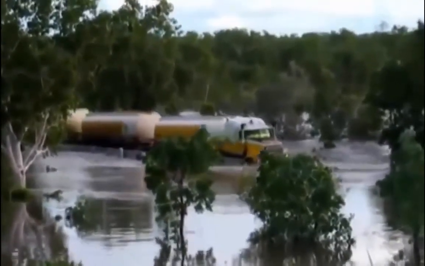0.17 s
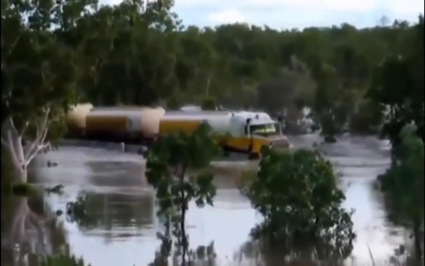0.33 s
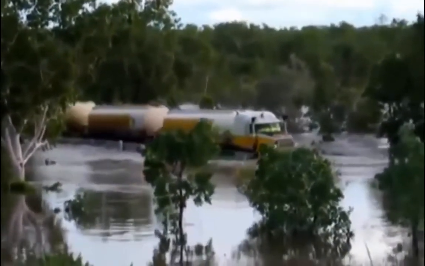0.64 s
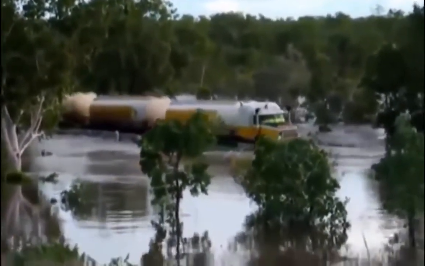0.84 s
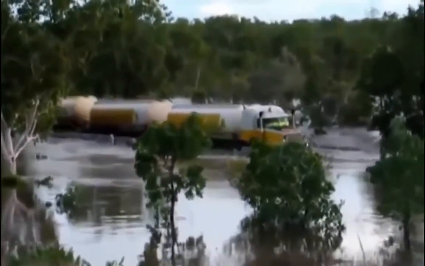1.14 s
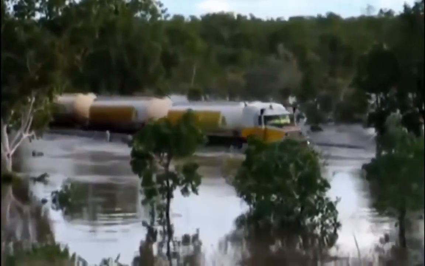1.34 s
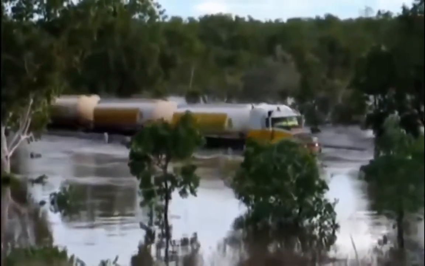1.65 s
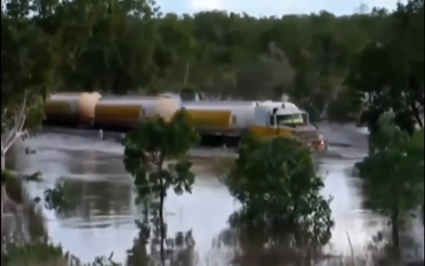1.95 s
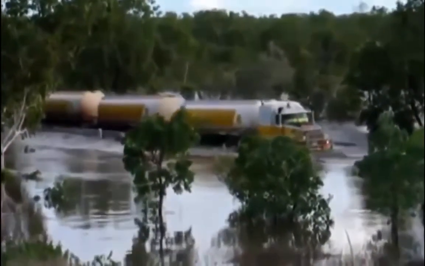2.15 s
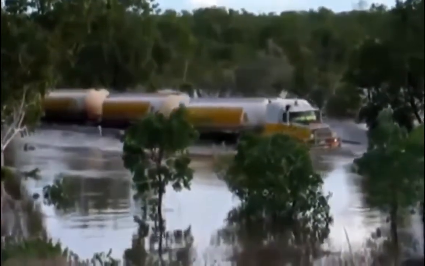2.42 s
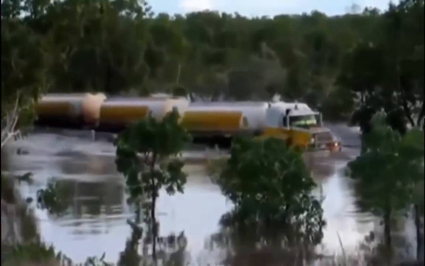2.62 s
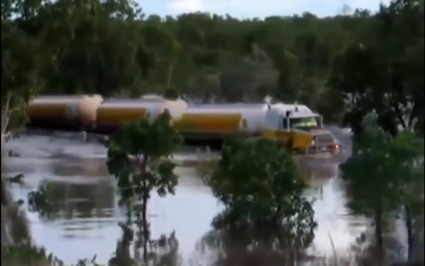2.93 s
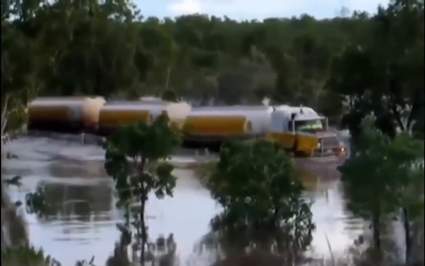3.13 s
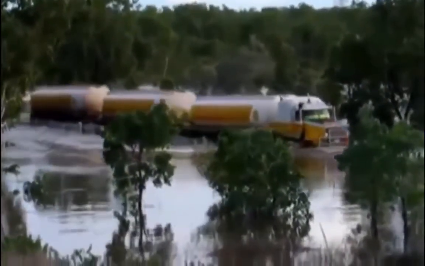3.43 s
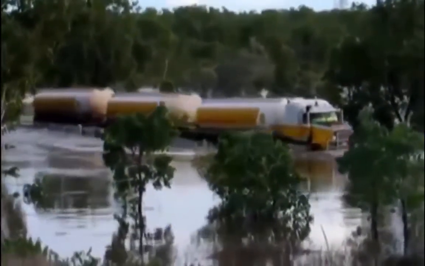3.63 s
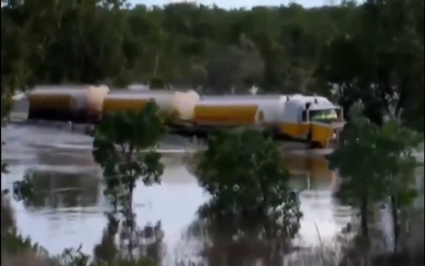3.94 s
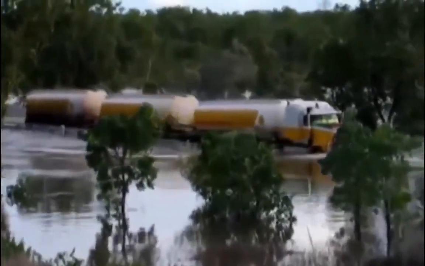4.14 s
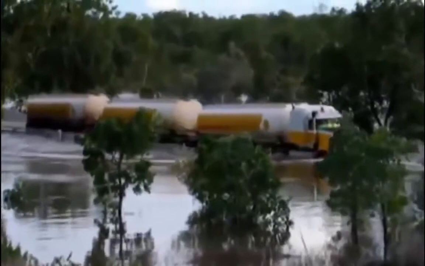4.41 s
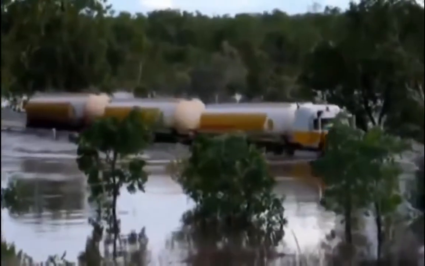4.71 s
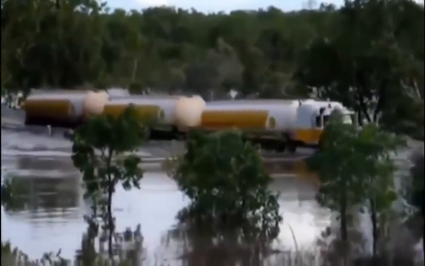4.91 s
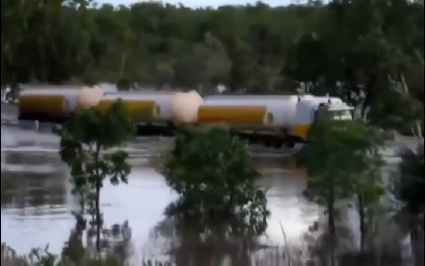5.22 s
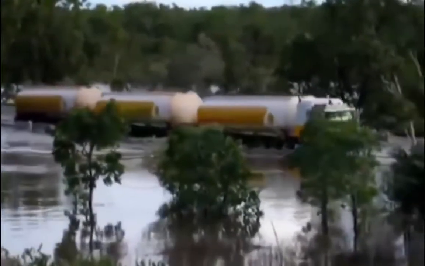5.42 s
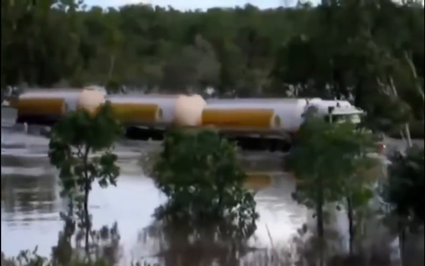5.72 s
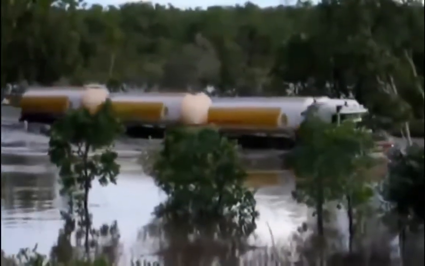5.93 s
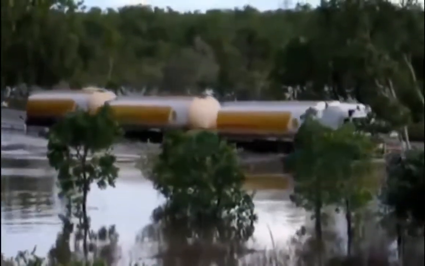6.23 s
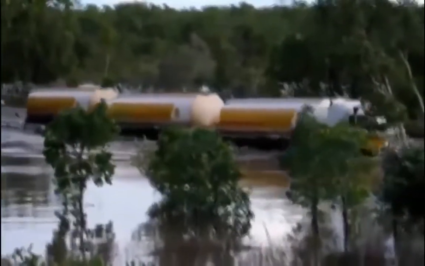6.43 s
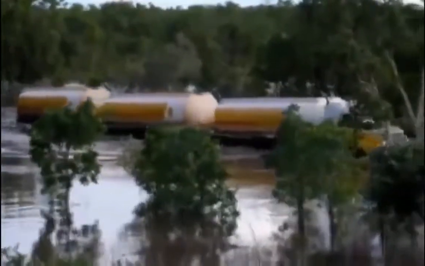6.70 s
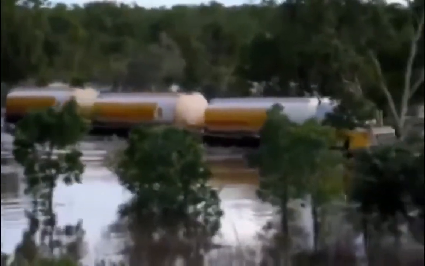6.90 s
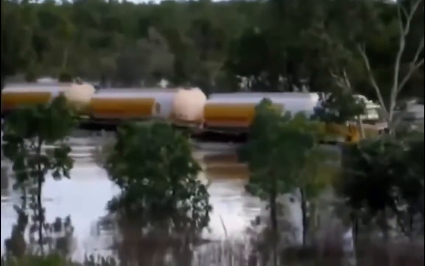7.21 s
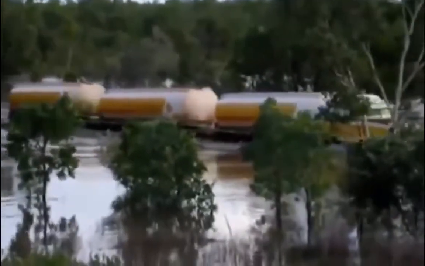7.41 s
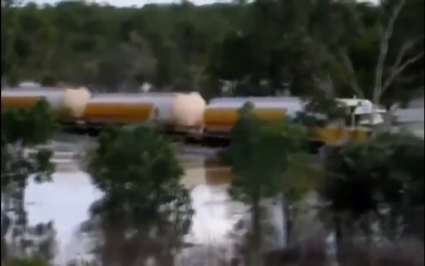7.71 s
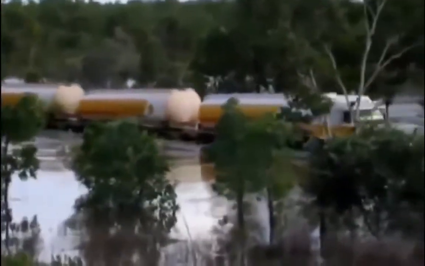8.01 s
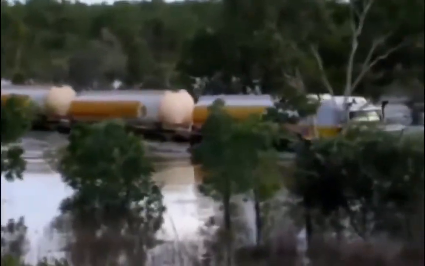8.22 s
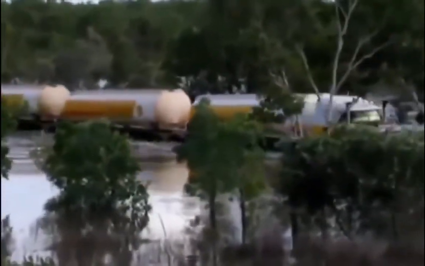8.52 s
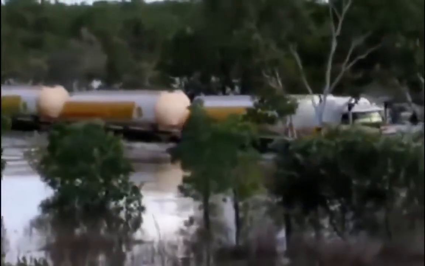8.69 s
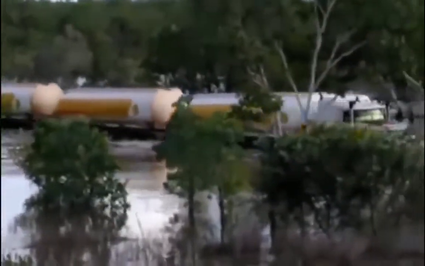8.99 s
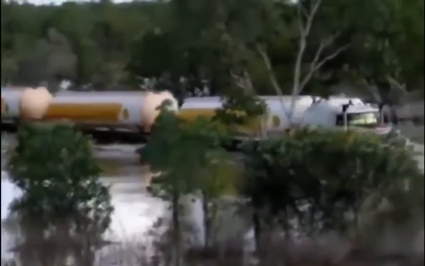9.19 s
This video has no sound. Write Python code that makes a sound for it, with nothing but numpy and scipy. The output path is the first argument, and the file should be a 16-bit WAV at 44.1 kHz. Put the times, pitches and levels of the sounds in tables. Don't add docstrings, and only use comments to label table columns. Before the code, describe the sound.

Quiet rushing flood water with a faint distant diesel hum abruptly cuts to a loud, muffled truck engine drone with buffeting wind and spray.

```python
import sys
import numpy as np
from scipy import signal
from scipy.fft import rfft, irfft, next_fast_len
from scipy.io import wavfile
from scipy.ndimage import uniform_filter1d, map_coordinates

SR = 44100
rng = np.random.default_rng(int(sys.argv[2]) if len(sys.argv) > 2 else 0)


def wav_out(sig):
    wavfile.write(sys.argv[1], SR, np.round(np.clip(np.atleast_2d(sig).T, -1, 1) * 32767).astype(np.int16))


def decibels_to_gain(level_db):
    exponent = np.asarray(level_db, float) / 20
    return 10 ** exponent


N = 412335
CUT_S = 4.2076

# time_s, wash_db, hum_hz
FAR_COURSE = [(0, -45.5, 131), (0.8, -47.5, 132.6), (1.25, -46.5, 131.3), (1.55, -45, 125.8),
              (2.0, -44.5, 128.9), (2.4, -44.5, 133), (2.85, -43.5, 125.5), (2.91, -45, 125),
              (3.2, -46, 122.1), (3.95, -45, 122.6), (4.1, -44, 124), (4.2, -45, 124.3)]
# freq_hz, density_db
FAR_WASH_SPECTRUM = [(20, -27), (60, -2.5), (180, -4), (400, -7.5), (600, -17.5), (1300, -13.5),
                     (2700, -9.5), (3500, -13.5), (4700, -16.5), (5800, -16.5), (7800, -21), (8800, -27.5),
                     (10950, -30.5), (11050, -48), (14900, -50)]
# centre_hz, width_hz, gain_db
FAR_WASH_MODES = [(828, 430, 15.5), (1617, 89, 10.5), (2177, 280, 13), (4140, 300, 3)]
# centre_hz, width_hz, gain_db
FAR_HUM_MODES = [(38.5, 5.9, -9), (88.5, 19, 6), (150, 10, 19)]
# freq_hz, density_db
GROUND_SPECTRUM = [(8, -3), (20, 4), (35, -3), (60, -32)]
# time_s, peak_db, pitch_hz
DROPLETS = [
    (1.5544, -26, 2230),
    (1.557, -26, 3300),
    (2.0344, -38, 2190),
    (2.4244, -32, 2200),
]
# start_s, stop_s, last_db, growth_db_per_s
AIR_BURSTS = [
    (1.96, 2.867, -36, 29),
    (4.015, 4.135, -37.5, 30),
]
# freq_hz, density_db
AIR_SPECTRUM = [(1500, -34), (2500, 4), (4000, 1), (5200, -2.5), (5750, 8.5), (6400, 2), (7800, -1),
                (9000, -8.5), (10950, -11.5), (11050, -25), (14900, -38)]
# time_s, second_order_hz, second_order_db
ENGINE_COURSE = [(4.21, 163.8, -17), (4.8, 162.1, -21), (5.15, 162.6, -18.5), (5.4, 162.3, -18.5),
                 (6.1, 161.7, -18), (6.55, 160.7, -17.5), (7.3, 161, -19.5), (7.95, 160.7, -15),
                 (8.2, 160.9, -18), (8.45, 161.4, -14), (9.2, 161.4, -14), (9.35, 159, -14.5)]
# multiple_of_firing_rate, level_re_second_db
WEAK_ORDERS = [(1, -24.5), (4, -17), (6, -23), (7, -23), (9, -23), (12, -24)]
# freq_hz, density_db
ROAR_SPECTRUM = [(45, -26.5), (75, -9.5), (150, -10), (260, -7.5), (400, -23.5), (560, -8), (790, -14.5),
                 (1050, -10), (1300, -17.5), (1800, -20), (2500, -23), (3300, -27), (15800, -27.5)]
# start_s, stop_s, level_db
SPRAY_SURGES = [
    (4.206, 4.448, -36.5),
    (5.079, 5.378, -27),
    (5.38, 5.909, -24.5),
    (6.0, 6.222, -33),
    (6.848, 7.317, -31),
    (7.617, 8.115, -32),
    (8.153, 8.939, -23.5),
    (8.89, 9.234, -24.5),
    (9.283, 9.41, -28),
]
# freq_hz, density_db
SPRAY_SPECTRUM = [(1500, -16), (2000, -4), (2400, -1), (2750, -10.5), (3200, -3.5), (3500, -12),
                  (5200, -23)]
# time_s, level_db, half_length_s
WIND_GUSTS = [(4.288, -16, 0.041), (4.489, -18, 0.085), (4.631, -11.5, .05), (4.859, -15.5, 0.067),
              (5.047, -14, 0.1), (5.326, -11, 0.072), (5.568, -15, 0.091), (5.698, -18, .04),
              (5.878, -16, 0.055), (6.1, -17, 0.04), (6.272, -11, 0.076), (6.4, -12.5, 0.026),
              (6.549, -12.5, .05), (6.741, -14, 0.032), (6.853, -12.5, .05), (7.052, -14, 0.051),
              (7.155, -14, 0.045), (7.492, -15, 0.029), (7.611, -12.5, 0.075), (7.854, -15.5, 0.06),
              (8.038, -13.5, 0.065), (8.153, -10.5, 0.037), (8.254, -15, 0.053), (8.705, -21.5, 0.061)]
# time_s, peak_db, pitch_hz
PORT_SLAPS = [(4.222, -12.5, 286), (4.312, -11.5, 306), (4.358, -9, 452), (4.504, -5, 339),
              (4.567, -9.5, 300), (4.612, -9.5, 380), (4.681, -6, 302), (4.758, -14.5, 360),
              (5.251, -13, 284), (5.4, -12.5, 283), (5.671, -10.5, 390), (5.783, -11, 344),
              (5.943, -7.5, 296), (6.102, -13, 318), (6.218, -4.5, 303), (6.362, -7, 394), (6.54, -12, 316),
              (6.622, -14, 306), (6.841, -8, 294), (6.998, -12, 247), (7.02, -9, 390), (7.23, -8.5, 375),
              (7.301, -4.5, 250), (7.427, -3.5, 336), (7.594, -12, 428), (7.789, -11, 335),
              (8.147, -17, 294), (8.189, -17, 241), (8.228, -11.5, 318), (8.7, -17, 336)]
# freq_hz, density_db
BUFFET_SPECTRUM = [(35, -18), (65, 0), (120, 0), (200, -2), (300, -16.5), (600, -32)]
# freq_hz, density_db
EDGE_SPECTRUM = [(120, -25), (200, 0.5), (300, -4.5), (450, -10.5), (800, -26), (1500, -32), (3000, -46.5)]
# freq_hz, density_db
HEAVE_SPECTRUM = [(15, -14), (30, -3.5), (50, -3), (80, -15)]
# time_s, depth_db, recovery_s
GAIN_DROPS = [(4.375, -6, 0.025), (4.52, -4.5, 0.039), (4.62, -2.5, 0.033), (4.70, -6.5, 0.025),
              (4.905, -6, 0.04), (5.079, -7, 0.075), (5.189, -5, 0.033), (5.41, -1.5, .03),
              (5.965, -5, 0.05), (6.3, -3.5, .03), (6.385, -6.5, 0.04), (6.44, -2.5, 0.025),
              (6.573, -8, 0.05), (6.65, -3.5, 0.023), (6.87, -5.5, 0.039), (7.335, -5, 0.027),
              (7.449, -6.5, 0.052), (7.63, -3.5, 0.047), (8.085, -7, 0.028), (8.246, -4, 0.029)]
# freq_hz, gain_db
CLOSE_EDGE = [(3300, 2), (3550, -4.5), (4600, -17), (4950, -20), (5200, -32), (15800, -45.5)]


def unit(x):
    return x / np.sqrt(np.mean(x ** 2) + 1e-20)


def curves(rows):
    s, *columns = np.transpose(rows)
    return [np.interp(np.arange(N) / SR, s, column) for column in columns]


def wobble(rate_hz):
    knots = rng.standard_normal(int(N * rate_hz / SR) + 4)
    return map_coordinates(knots, [np.arange(N) * rate_hz / SR])


def ramp(start_s, takes_s):
    return np.clip((np.arange(N) / SR - start_s) / takes_s, 0, 1)


def bump(centre_s, half_s):
    out = np.zeros(N)
    first = max(0, int((centre_s - 4 * half_s) * SR))
    last = min(N, int((centre_s + 4 * half_s) * SR))
    reach = np.arange(first, last)
    out[reach] = np.exp(-((reach / SR - centre_s) / half_s) ** 2)
    return out


def level(base_db, swells):
    power = decibels_to_gain(base_db) ** 2 + sum((decibels_to_gain(db) * shape) ** 2 for db, shape in swells)
    return 10 * np.log10(power)


def filtered(x, response):
    m = next_fast_len(N + 8192)
    return irfft(rfft(x, m) * response(np.fft.rfftfreq(m, 1 / SR)), m)[:N]


def colour(points):
    f, db = np.transpose(points)
    return lambda hz: decibels_to_gain(np.interp(np.log(hz + 1), np.log(f + 1), db, left=-120, right=-120))


def humps(modes):
    return lambda hz: sum(decibels_to_gain(db) / (1 + (2 * (hz - c) / w) ** 2) for c, w, db in modes)


def rush(response, patchy_db, spiky_db=0.0):
    noise = rng.standard_normal(N) * decibels_to_gain(spiky_db * wobble(900))
    z = signal.stft(noise, nperseg=512)[2]
    field = uniform_filter1d(rng.standard_normal(z.shape), size=6, axis=0)
    field = uniform_filter1d(field, size=10, axis=1)
    patched = signal.istft(z * decibels_to_gain(patchy_db * unit(field)), nperseg=512)[1][:N]
    return unit(filtered(patched, response))


def wavering(hz, drift_rad, flutter_db):
    phase = 2 * np.pi * np.cumsum(hz) / SR + drift_rad * wobble(12)
    return unit(decibels_to_gain(flutter_db * wobble(9)) * np.sin(phase))


def band(centre_hz, width_hz):
    phase = 2 * np.pi * np.cumsum(centre_hz) / SR
    return unit(wobble(width_hz) * np.cos(phase) + wobble(width_hz) * np.sin(phase))


def blips(rows, cycles):
    out, t = np.zeros(N + SR), np.arange(SR // 10) / SR
    for s, db, hz in rows:
        swing = np.sin(2 * np.pi * hz * t) * np.exp(-hz * t / cycles)
        out[round(s * SR):][:len(t)] += decibels_to_gain(db) * swing
    return out[:N]


def far_wash(wash_db):
    shape = lambda hz: colour(FAR_WASH_SPECTRUM)(hz) * (1 + 0.5 * humps(FAR_WASH_MODES)(hz))
    return decibels_to_gain(wash_db + 7.5 + 0.92 * wobble(12)) * rush(shape, patchy_db=0.5, spiky_db=-1.0)


def far_hum(effort_db, hum_hz):
    nears_db = 1.0 * (np.arange(N) / SR - 2)
    hum = decibels_to_gain(-47.5 + effort_db + nears_db) * wavering(hum_hz, drift_rad=0.99, flutter_db=0.0)

    boom_hz = 366.6 + 1.9 * (hum_hz - 128)
    boom_db = -51.5 + effort_db - 18 * bump(1.66, half_s=0.17)
    hum = hum + decibels_to_gain(boom_db) * wavering(boom_hz, drift_rad=1.2, flutter_db=3.0)

    lowest_db = -58
    hum = hum + decibels_to_gain(lowest_db + 6.0) * rush(humps(FAR_HUM_MODES), patchy_db=2.5)
    emerging_db = lowest_db + 5.5 * ramp(2.3, takes_s=0.3)
    for third, db in ((1, -2), (2, -1)):
        tone = wavering(hum_hz * third / 3, drift_rad=0.84, flutter_db=2.5)
        hum = hum + decibels_to_gain(emerging_db + db) * tone
    return hum


def ground_rumble():
    return decibels_to_gain(-61) * rush(colour(GROUND_SPECTRUM), patchy_db=-3.0)


def droplets():
    return filtered(decibels_to_gain(2.0) * blips(DROPLETS, cycles=2.5), lambda hz: hz < 11000)


def valve_air():
    t, edge_s = np.arange(N) / SR, 0.007
    swells = [(-51, ramp(1.7, takes_s=0.5))]
    for start_s, stop_s, last_db, growth in AIR_BURSTS:
        burst_db = last_db + growth * np.minimum(t - stop_s, 0)
        swells.append((burst_db, ramp(start_s, edge_s) - ramp(stop_s, edge_s)))
    air_db = level(-90, swells) + 1.5 * wobble(24.66)
    return decibels_to_gain(air_db) * rush(colour(AIR_SPECTRUM), patchy_db=1.0, spiky_db=1.5)


def far_truck():
    wash_db, hum_hz = curves(FAR_COURSE)
    effort_db = wash_db + 45.5
    truck = far_wash(wash_db) + far_hum(effort_db, hum_hz) + ground_rumble()
    return truck + droplets() + valve_air()


def diesel_drone(phase, second_db, load_db):
    windy_db = 1.2 * (1 - ramp(8.3, takes_s=0.1))
    third_db = -22 + 1.2 * load_db + windy_db * wobble(14)
    second_db = second_db + windy_db * wobble(14)
    second = np.sin(2 * phase + 0.051 * wobble(11))
    third = np.sin(3 * phase + 1.25 + 0.088 * wobble(15))
    drone = decibels_to_gain(second_db + 2.0 + 0.35 * wobble(20)) * second
    drone = drone + decibels_to_gain(third_db + 2.5 + 1.0 * wobble(22)) * third
    for multiple, db in WEAK_ORDERS:
        order_db = second_db - 2.5 + db + 2.2 * wobble(7.7)
        drone = drone + decibels_to_gain(order_db) * np.sin(round(multiple) * phase + 0.6 * wobble(8))
    return np.sqrt(2) * drone


def engine_roar(phase, load_db):
    roar_db = -28 + 1.3 * load_db + 1.9 * wobble(9.1)
    pulse = decibels_to_gain(0.5 * np.cos(phase + 0.26))
    noise = rush(colour(ROAR_SPECTRUM), patchy_db=-1.0, spiky_db=2.5)
    return decibels_to_gain(roar_db + 5.5) * unit(pulse * noise)


def wheel_spray():
    swells = []
    for start_s, stop_s, db in SPRAY_SURGES:
        rise = ramp(start_s, takes_s=0.33 * (stop_s - start_s))
        fall = 1 - ramp(stop_s, takes_s=0.049)
        swells.append((db, rise * fall))
    spray_db = level(-32, swells)
    hiss = rush(colour(SPRAY_SPECTRUM), patchy_db=2.5, spiky_db=-1.0)
    whistle = decibels_to_gain(0.6 * (spray_db + 24.5)) * band(2720 + 130 * wobble(5), width_hz=330)
    return decibels_to_gain(spray_db - 3.03 + 1.1 * wobble(30)) * (hiss + whistle)


def wind_strength():
    lull_db = -3 * ramp(8.3, takes_s=0.1)
    buffet_db = level(-20.5 + lull_db, [(db, bump(s, half_s)) for s, db, half_s in WIND_GUSTS])
    edge_db = level(-27 + lull_db, [(db - 8.5, bump(s, half_s=0.018)) for s, db, hz in PORT_SLAPS])
    return buffet_db, edge_db


def port_wind():
    buffet_db, edge_db = wind_strength()
    eddies = wobble(35)
    body = unit(decibels_to_gain(1.02 * eddies) * rush(colour(BUFFET_SPECTRUM), patchy_db=-1.0))
    buffet = decibels_to_gain(buffet_db + 3.5) * body
    flutter = decibels_to_gain(3 * eddies + 2.5 * wobble(70))
    edge = decibels_to_gain(edge_db + 5.0) * unit(flutter * rush(colour(EDGE_SPECTRUM), patchy_db=0.5))
    heave_db = buffet_db - 11 + 0.5 * (buffet_db + 16.5)
    heave = decibels_to_gain(heave_db) * rush(colour(HEAVE_SPECTRUM), patchy_db=1.0)
    slaps = decibels_to_gain(5.5) * blips(PORT_SLAPS, cycles=2.0)
    return filtered(buffet + edge + heave + slaps, lambda hz: hz < 3500)


def near_truck():
    second_hz, second_db = curves(ENGINE_COURSE)
    load_db = second_db + 17.5
    phase = np.pi * np.cumsum(second_hz) / SR
    engine = diesel_drone(phase, second_db, load_db) + engine_roar(phase, load_db)
    return engine + wheel_spray() + port_wind()


def gain_control():
    t, gain_db = np.arange(N) / SR, np.zeros(N)
    for s, depth_db, recovery_s in GAIN_DROPS:
        attack = np.clip((t - s) / 0.004, 0, 1)
        recovery = np.exp(-np.clip((t - s) / recovery_s, 0, None) ** 2)
        gain_db += depth_db * attack * recovery
    return decibels_to_gain(gain_db)


def scene():
    close = ramp(CUT_S, takes_s=0.0004)
    narrow = lambda hz: np.where(hz < CLOSE_EDGE[0][0], 1, colour(CLOSE_EDGE)(hz))
    near = gain_control() * filtered(near_truck(), narrow)
    return ((1 - close) * far_truck() + close * near)[None]


def top_cut(x):
    return signal.sosfilt(signal.butter(12, 15830, fs=SR, output="sos"), x)


def record(dry):
    flat = np.clip(dry[0], -0.372, 0.372)
    coupled = filtered(flat, lambda hz: 1j * hz / (6 + 1j * hz))
    late = filtered(coupled, lambda hz: 1 / np.sqrt(1 + (hz / 14000) ** 2)) - 0.0042
    mix = np.where(np.arange(N) < CUT_S * SR, coupled, late)
    return top_cut(mix[None])


dry = scene()
out = record(dry)
wav_out(out)
```